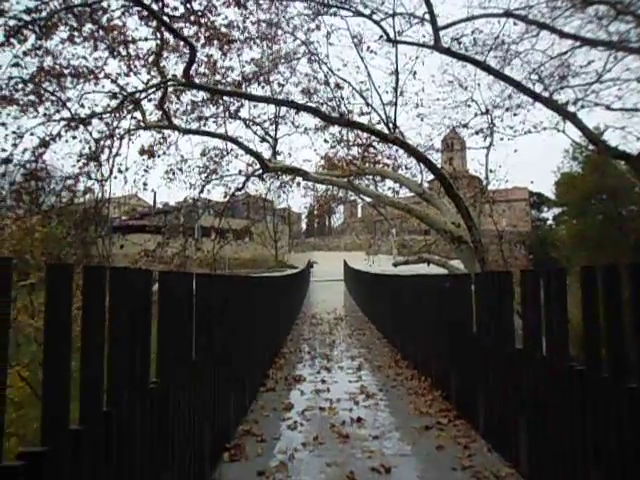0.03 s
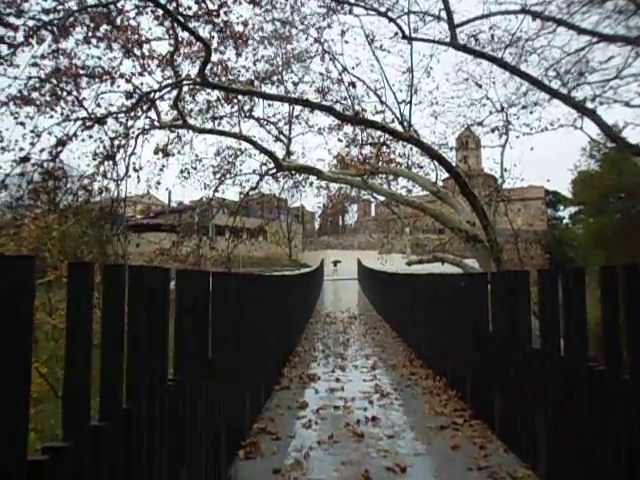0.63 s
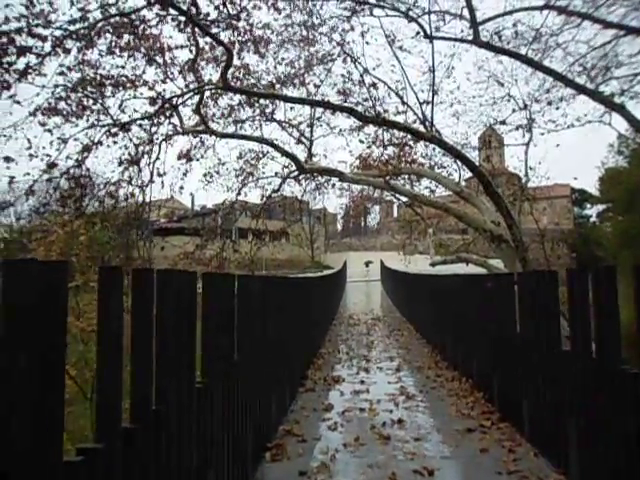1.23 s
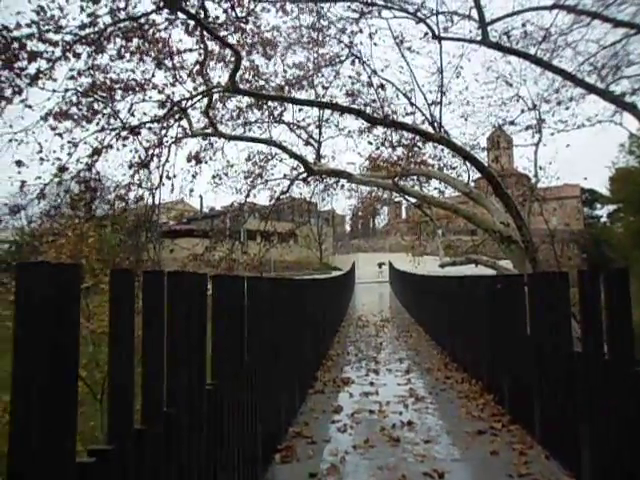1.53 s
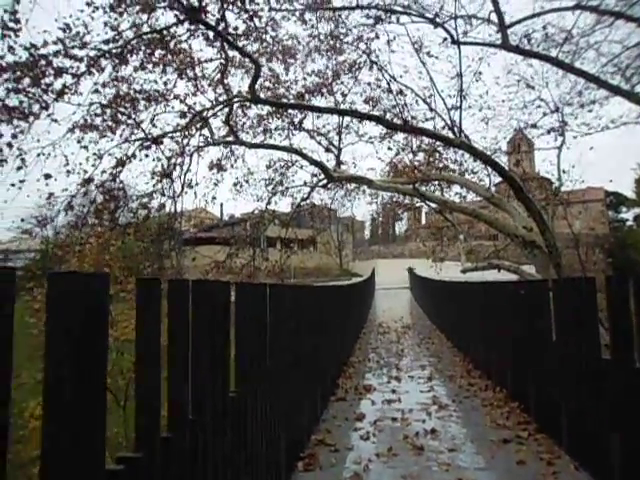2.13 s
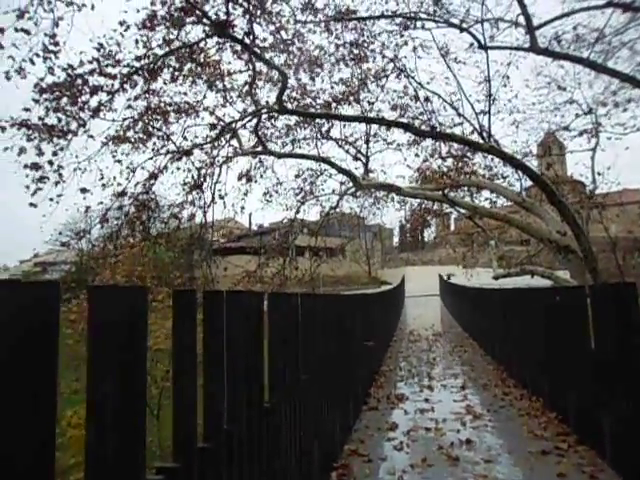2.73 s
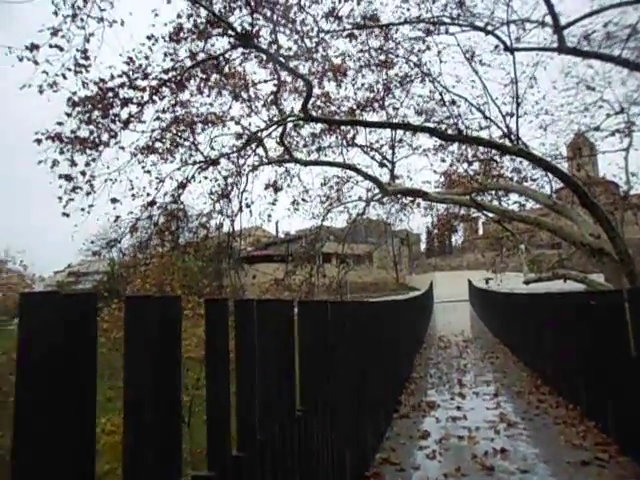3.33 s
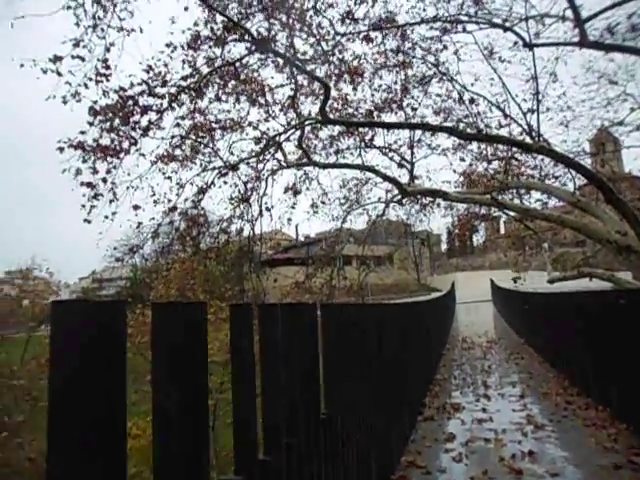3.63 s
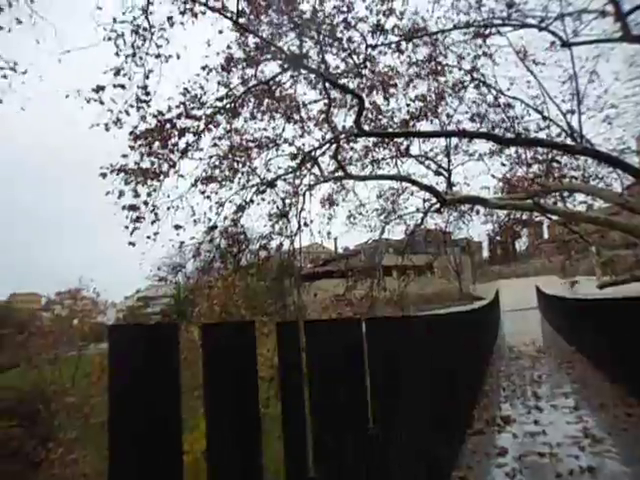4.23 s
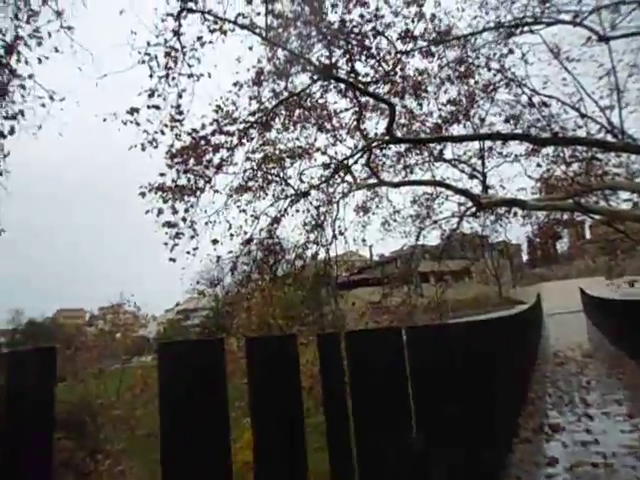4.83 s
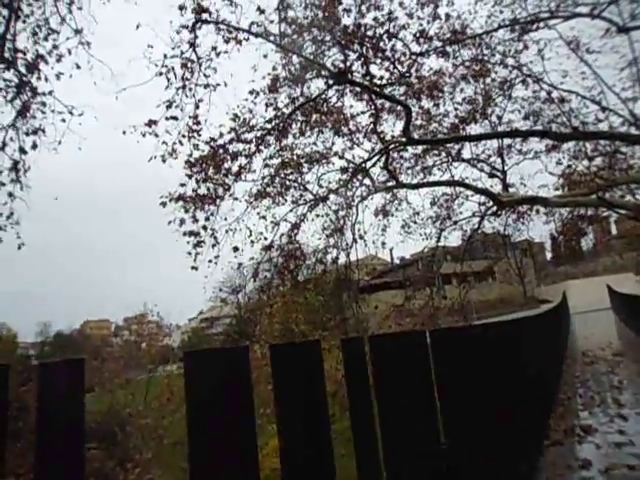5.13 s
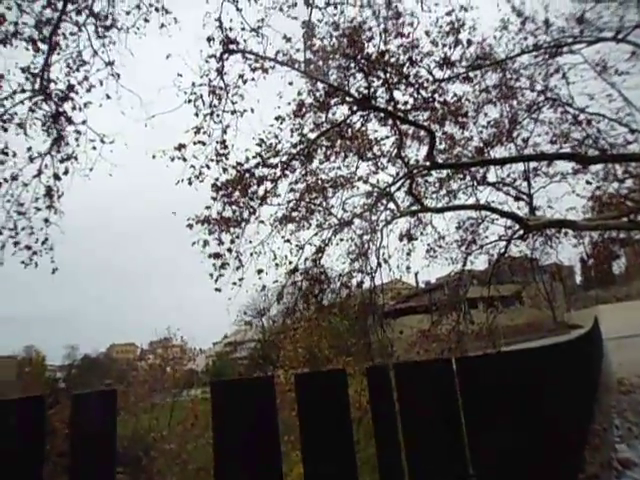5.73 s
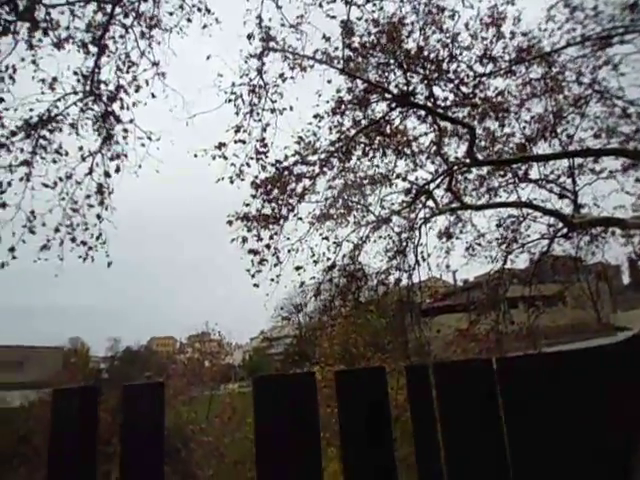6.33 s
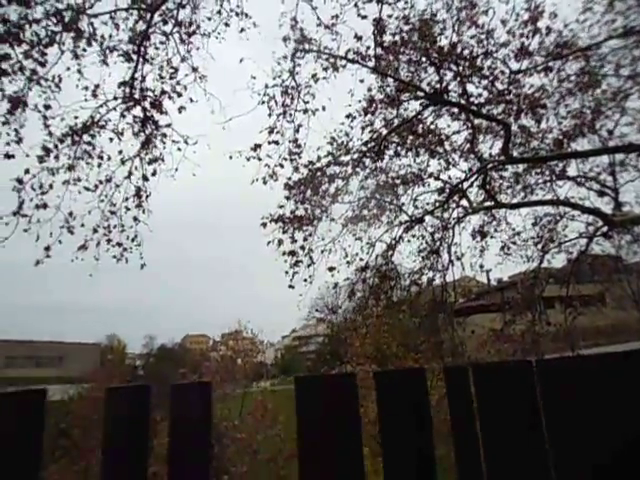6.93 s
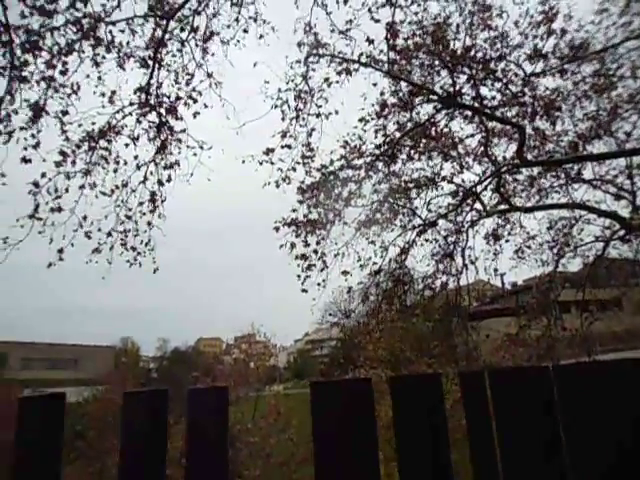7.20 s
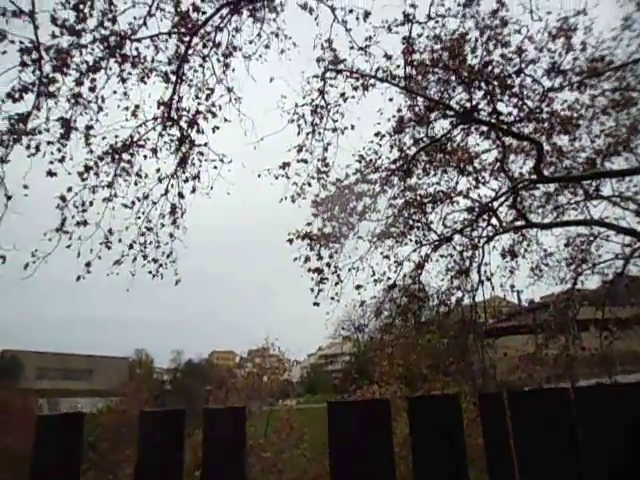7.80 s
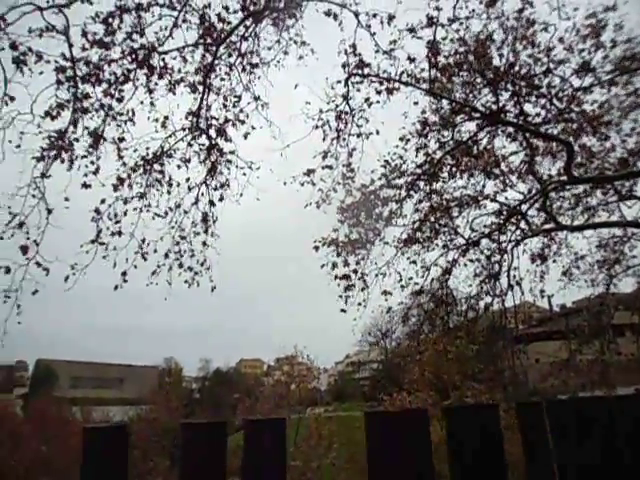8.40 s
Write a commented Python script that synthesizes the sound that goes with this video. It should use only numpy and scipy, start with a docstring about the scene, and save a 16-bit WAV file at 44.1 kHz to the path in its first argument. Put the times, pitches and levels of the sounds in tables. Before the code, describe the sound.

Raindrops tick on wet leaves and a footbridge railing over a fine hiss and far traffic, ending in low wind buffeting.

```python
"""Light rain on a footbridge under autumn trees: near drops tick as they make wet leaves and the
railing ring, while countless far drops blend into a fine hiss. Now and then a leaf scrapes.
Far off, a town murmurs with traffic and a faint whine of machinery. Swirls of air (eddies) in a
breeze nudge the microphone and buffet it hard in the last second."""
import sys
import numpy as np
from scipy import signal
from scipy.fft import rfft, irfft
from scipy.io import wavfile
from scipy.ndimage import uniform_filter1d, map_coordinates

SR = 44100
rng = np.random.default_rng(int(sys.argv[2]) if len(sys.argv) > 2 else 0)


def materialize(psi):
    """Save the field psi as 16-bit PCM at rate SR to the path in sys.argv[1].

    A 1-D psi becomes a single channel; in a 2-D psi each row is a channel.
    """
    bounded = np.clip(np.atleast_2d(psi).T, -1, 1)
    quanta = np.round(bounded * 32767).astype(np.int16)
    wavfile.write(sys.argv[1], SR, quanta)


N = 377496
TIME = np.arange(N) / SR
FREQ = np.fft.rfftfreq(N, 1 / SR)

# gusts of wind: (start [s], length [s], push of large eddies [dB], flutter of small eddies [dB])
GUSTS = [(0.972, 0.91, -45, -68), (1.513, .12, -39, -60), (4.08, .27, -43, -61), (5.572, 0.067, -40, -43.5),
         (5.93, 1.23, -43, -58), (6.5, 0.12, -39, -53), (6.712, 0.0598, -45.5, -45), (7.4, .2, -42, -56),
         (7.6, 0.072, -31.5, -32.5), (7.69, 0.095, -22.5, -28.5), (7.81, .18, -28, -34),
         (8.005, .15, -27, -29.5), (8.15, .15, -36, -48), (8.281, .16, -28, -32.5),
         (8.487, 0.052, -33, -32)]


def gain_of(db):
    """Turns decibels into a factor to multiply a sound by."""
    return 10 ** (np.asarray(db) / 20)


def evened(x):
    """Scales a signal to an average strength (rms) of 1."""
    return x / np.sqrt(np.mean(x ** 2) + 1e-20)


def curve(rows):
    """Joins (time [s], value) rows by straight lines."""
    return np.interp(TIME, *np.transpose(rows))


def add(mix, start_s, sound):
    """Mixes a sound in at its start time."""
    part = mix[max(round(start_s * SR), 0):][:len(sound)]
    part += sound[:len(part)]


def coloured_noise(spectrum):
    """Noise of strength 1, shaped by (frequency [Hz], relative level [dB]) rows."""
    hz, db = np.transpose(spectrum)
    shape = gain_of(np.interp(np.log(FREQ + 1), np.log(hz), db))
    return evened(irfft(rfft(rng.standard_normal(N)) * shape, N))


def band_noise(hz, width_hz):
    """Noise of strength 1 around one pitch; around 0 Hz it is a slow random drift."""
    bell = np.exp(-.5 * ((FREQ - hz) / width_hz) ** 2)
    return evened(irfft(rfft(rng.standard_normal(N)) * bell, N))


def ring(hz, t60, rise_s=0.000074):
    """One tone of a softly struck surface; it fades by 60 dB in t60 seconds."""
    t = np.arange(2048) / SR
    return np.sin(2 * np.pi * hz * t) * (1 - np.exp(-t / rise_s)) * np.exp(-np.log(1000) * t / t60)


def town(murmur_db=-51, waver_hz=3.47, fade_db=3.0):
    """A low murmur, passing tyres and a machine whine that wavers and fades on the moving air."""
    # tone of the murmur: (frequency [Hz], relative level [dB])
    murmur_spectrum = [(10, -5.5), (25, -5), (50, -4), (100, -7), (130, -11), (165, -9), (205, -11),
                       (300, -17.5), (400, -20), (650, -29.5), (1000, -32), (2500, -54.5)]
    # far traffic swelling and fading: (time [s], level [dB])
    traffic = [(0, -66), (.45, -59), (1.3, -58), (2.2, -62.5), (3.5, -67), (8.56, -69)]
    # tones of far machinery: (pitch [Hz], level before the swell [dB])
    whine_tones = [(650, -68.5), (725, -78), (969, -75), (1190, -76.5)]
    # swell of the whine: (time [s], level change [dB])
    whine_swell = [(0, -4), (2.5, 0.5), (4, -2), (5.4, -2.5), (5.9, 1.5), (7.2, 1.5), (8.56, 2.5)]
    murmur = gain_of(murmur_db) * coloured_noise(murmur_spectrum)
    tyres = gain_of(curve(traffic)) * band_noise(hz=423, width_hz=315)
    whine = np.zeros(N)
    for hz, db in whine_tones:
        cycles = np.cumsum(hz + waver_hz * band_noise(0, 7.4)) / SR
        fading = gain_of(fade_db * band_noise(0, 4.4))
        whine += gain_of(db) * evened(np.sin(2 * np.pi * cycles) * fading)
    return murmur + tyres + gain_of(curve(whine_swell)) * whine


def gust_level(strengths_db, release_s, calm_db, attack_s=.03):
    """Level in dB of one size of eddy: each gust rises quickly, holds and dies away into the calm."""
    power = np.full(N, gain_of(calm_db) ** 2)
    for (start, length, _, _), db in zip(GUSTS, strengths_db):
        rise = np.clip((TIME - start) / attack_s, 0, 1)
        fall = np.exp(-np.clip((TIME - start - length) / release_s, 0, 20))
        power += (gain_of(db) * rise * fall) ** 2
    return 10 * np.log10(power)


def eddies(spectrum, level_db, full_db, speed_per_db, steady_s=.07):
    """Swirling air drifts past the microphone; stronger wind carries it faster, so it sounds higher."""
    speed = np.exp(speed_per_db * np.clip(level_db - full_db, -25, 1.5))
    pressure = map_coordinates(coloured_noise(spectrum), [np.cumsum(speed)], order=3, mode="mirror")
    # even out chance swells, so that level_db sets the loudness
    local_power = abs(uniform_filter1d(pressure ** 2, int(steady_s * SR)))
    return gain_of(level_db) * pressure / np.sqrt(local_power + 0.018)


def wind(lumpy_db=1.4, ragged_db=1.9):
    """Large eddies push unevenly all along; small ones flutter raggedly in the gusts and die sooner."""
    # pressure of the large eddies: (frequency [Hz], relative level [dB])
    push_spectrum = [(10, -8.5), (22, -3), (47, -0.5), (62, -4), (90, -6), (125, -15), (210, -36),
                     (500, -67)]
    # pressure of the small eddies: (frequency [Hz], relative level [dB])
    flutter_spectrum = [(40, -25), (95, -2), (170, -1), (260, -7.5), (350, -15.5), (500, -26), (700, -35.5),
                        (1200, -80.5)]
    _, _, pushes, flutters = np.transpose(GUSTS)
    push_db = gust_level(pushes, release_s=.03, calm_db=-49) + lumpy_db * band_noise(0, 6)
    flutter_db = gust_level(flutters, release_s=.018, calm_db=-79) + ragged_db * band_noise(0, 44.9)
    push = eddies(push_spectrum, push_db, full_db=-28, speed_per_db=0.0354)
    flutter = eddies(flutter_spectrum, flutter_db, full_db=-30, speed_per_db=0.029)
    return push + flutter


def thumps():
    """One tight eddy thumps the microphone: a peak of pressure between two shallow dips."""
    # single hard eddies: (time [s], peak level [dB], pitch [Hz])
    hard_eddies = [(1.165, -28.5, 35), (6.11, -24, 28), (6.127, -27, 132), (6.335, -29, 27.8),
                   (6.539, -32.5, 100), (7.785, -25.5, 229.2), (7.85, -21, 130), (8.06, -19.5, 105),
                   (8.089, -19.5, 240), (8.331, -18.5, 260)]
    out = np.zeros(N)
    for peak_s, db, hz in hard_eddies:
        offset_squared = (np.pi * hz * (TIME - peak_s)) ** 2
        out += gain_of(db) * (1 - 2 * offset_squared) * np.exp(-np.minimum(offset_squared, 50))
    return out


def leaves(width_hz=2400):
    """A scraping leaf makes a quick run of tiny slips, each ringing very briefly."""
    # leaf scrapes: (start [s], length [s], level [dB], centre pitch [Hz])
    scrapes = [(0.297, 0.051, -56, 4800), (0.674, 0.032, -50.5, 6200), (3.664, .025, -54, 6800),
               (3.778, 0.019, -48.5, 7100), (3.799, 0.021, -50, 5950), (6.002, 0.059, -53, 5770),
               (6.808, .025, -54, 3500), (8.336, 0.058, -53, 5970)]
    t60 = np.log(1000) / np.pi / width_hz  # a shorter ring covers a wider band of pitches
    out = np.zeros(N)
    for start, length, db, hz in scrapes:
        slips = rng.laplace(size=N)[:int(length * SR)]
        rustle = signal.fftconvolve(slips, ring(hz, t60))[:len(slips)]
        add(out, start, gain_of(db) * evened(rustle) * signal.windows.tukey(len(slips), .5))
    return out


def walkway(sound, echo_db=-16, t60=0.12, gap_s=0.0032, echoes_per_s=3000):
    """The slatted railings and the deck scatter each tick into a short, thin tail of echoes."""
    t = np.arange(SR // 4) / SR
    echoes = rng.choice([-1., 1.], len(t)) * (rng.random(len(t)) < echoes_per_s / SR) * (t > gap_s)
    echoes *= np.exp(-np.log(1000) * t / t60)
    return sound + gain_of(echo_db) * signal.oaconvolve(sound, echoes / np.linalg.norm(echoes))[:N]


def far_rain(level_db=-50.5, swell_db=0.41, flicker_db=0.51):
    """Countless far drops merge into a hiss that barely wavers."""
    # tone of the hiss: (frequency [Hz], relative level [dB])
    hiss_spectrum = [(100, -22), (450, 0), (800, 2.5), (1300, -0.5), (1900, -0.5), (3000, -0.36),
                     (4000, -0.5), (4700, -0.5), (5500, -1.35), (6500, -4.5), (7400, -8.5)]
    waver_db = swell_db * band_noise(0, 1.9) + flicker_db * band_noise(0, 40)
    return gain_of(level_db + waver_db) * coloured_noise(hiss_spectrum)


def patter(level_db=-61, drops_per_s=520, spread_db=3.5, t60=0.0041, leaf_count=28):
    """Small drops of uneven size land on many leaves, each leaf with its own pitch."""
    sizes = gain_of(spread_db * np.minimum(rng.exponential(1, N), 4.2))
    hits = sizes * (rng.random(N) < drops_per_s / SR)
    leaf_hit = rng.integers(0, leaf_count, N)
    out = np.zeros(N)
    for leaf, hz in enumerate(np.linspace(1700, 7000, leaf_count)):
        tick = ring(hz, t60) + 0.77 * ring(hz * rng.uniform(0.49, .8), t60)
        out += signal.oaconvolve(hits * (leaf_hit == leaf), tick)[:N]
    return gain_of(level_db) * evened(out)


def drips(typical_db=-41, spread_db=3, tries=160):
    """Lighter drips fall at random moments on random leaves; gives rows of drops for near_drops."""
    # dripping from the branches, thickest at first: (time [s], rate [drips per s])
    drip_rate = [(0, 11), (1.5, 8.9), (2.1, 3), (8.56, 3)]
    rows = []
    for when, chance, size, low, high in rng.random((tries, 5)):
        start = when * N / SR
        if chance * tries * SR / N < np.interp(start, *np.transpose(drip_rate)):
            size_db = typical_db + spread_db * (2 * size - 1)
            low_hz = np.interp(low, (0, 1), (2200, 3400))
            high_hz = np.interp(high, (0, 1), (4100, 6200))
            rows.append((start, size_db, low_hz, high_hz, 0))
    return rows


def near_drops(boost_db=2, tick_t60=0.0038, snap_db=-1, splash_db=-11, splash_t60=0.028, bass_hz=950):
    """Drops from the branches land with a bright snap, a short two-tone tick and a little spray."""
    # the heaviest drops, each ringing two tones of what it hits:
    # (time [s], relative level [dB], low tone [Hz], high tone [Hz], high tone over low [dB])
    heavy_drops = [(0.0833, -25, 3070, 4300, 7), (0.15, -35.5, 3210, 4580, -1.5),
                   (0.3243, -34.5, 3300, 4500, -2), (0.342, -30.5, 2400, 5400, 5),
                   (0.4629, -35.5, 3040, 5650, 11), (0.4836, -38, 3000, 5160, -3.5),
                   (0.4934, -37, 3060, 5160, -1), (0.5785, -36, 2390, 4780, -6),
                   (1.0374, -13.5, 1850, 4140, -2), (1.0712, -34.5, 3330, 4450, 4),
                   (1.5259, -36, 3090, 5080, 0), (1.5965, -28.5, 2930, 5100, -5),
                   (2.5927, -36, 2680, 4240, -7), (2.7956, -20.5, 2730, 5370, 3.5),
                   (3.1441, -28, 3350, 5000, 2), (5.8016, -36.5, 2170, 4200, -11),
                   (5.8537, -36.5, 2200, 5700, -1), (6.1112, -35, 3110, 5720, -5),
                   (6.5128, -39.5, 1550, 3300, -13), (6.8207, -36, 2270, 4670, -5),
                   (8.1643, -34, 3040, 4730, 0), (8.3478, -35, 3000, 5713, 1)]
    spray = band_noise(hz=4300, width_hz=2800)
    spray_fade = np.exp(-np.log(1000) * np.arange(2048) / SR / splash_t60)
    snap = gain_of(snap_db) * ring(hz=6200, t60=0.00066)
    out = np.zeros(N)
    for start, size_db, low_hz, high_hz, bright_db in heavy_drops + drips():
        low_tone = gain_of(-bright_db / 2) * ring(low_hz, tick_t60)
        high_tone = gain_of(bright_db / 2) * ring(high_hz, tick_t60)
        splash = np.roll(spray, -round(start * SR))[:len(spray_fade)] * spray_fade
        splash *= gain_of(min(size_db, -31) + splash_db)  # the hardest blows throw no extra spray
        add(out, start, gain_of(size_db) * (low_tone + high_tone + snap) + splash)
    # such small surfaces give off no bass
    bass_cut = signal.butter(2, bass_hz, "high", fs=SR, output="sos")
    return gain_of(boost_db) * signal.sosfilt(bass_cut, out)


def scene():
    """Rain, leaves, town and wind at one microphone."""
    ticks = walkway(near_drops() + patter() + leaves())
    return (ticks + far_rain() + town() + wind() + thumps())[None]


def record(dry, edge_hz=7620, cut_hz=8800, leak_db=-19):
    """The recorder loses the top treble: only a little leaks past edge_hz, and none past cut_hz."""
    edge = signal.firwin(301, edge_hz, window=("kaiser", 9), fs=SR)[None]
    cut = signal.firwin(301, cut_hz, window=("kaiser", 9), fs=SR)[None]
    passed = signal.oaconvolve(dry, edge, "same")
    leak = gain_of(leak_db) * (dry - passed)
    return signal.oaconvolve(passed + leak, cut, "same")


dry = scene()
out = record(dry)
materialize(out)
```